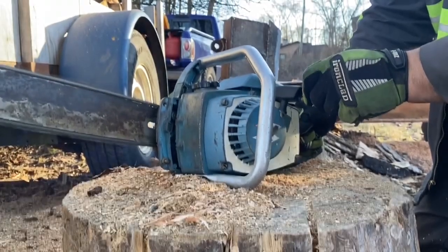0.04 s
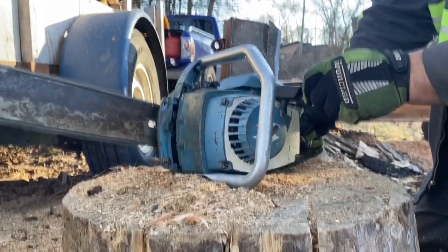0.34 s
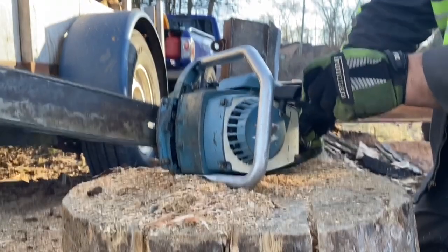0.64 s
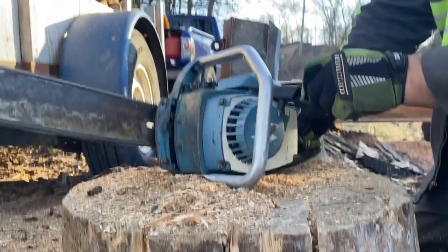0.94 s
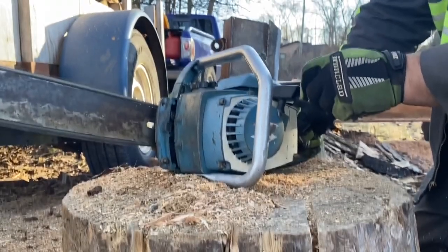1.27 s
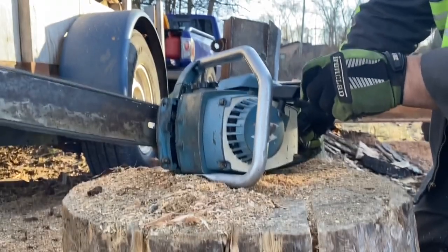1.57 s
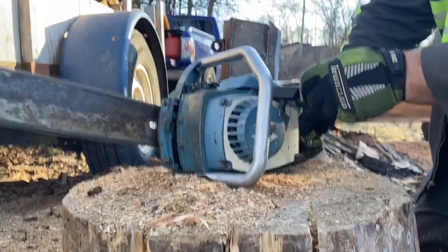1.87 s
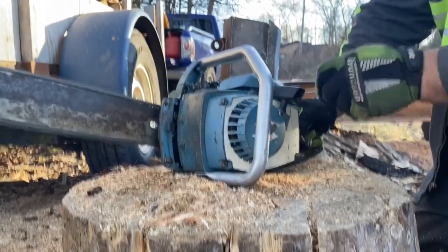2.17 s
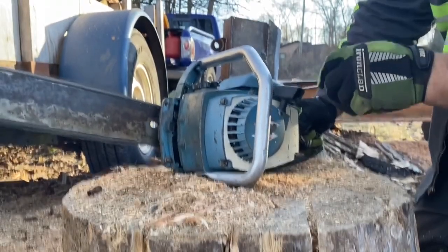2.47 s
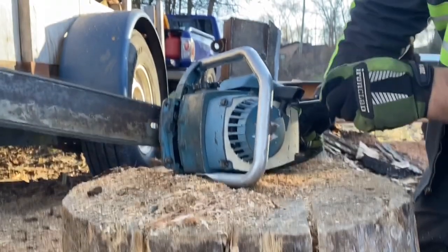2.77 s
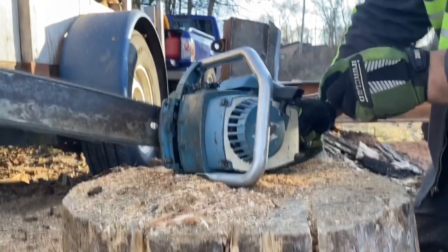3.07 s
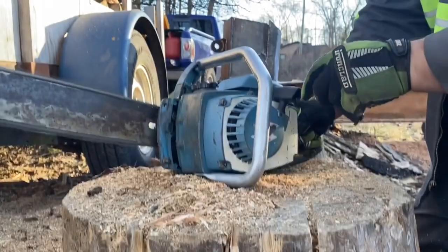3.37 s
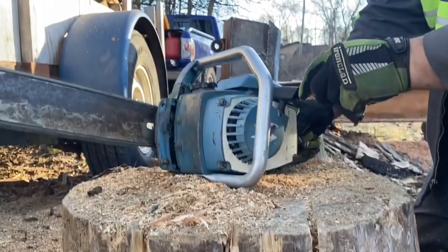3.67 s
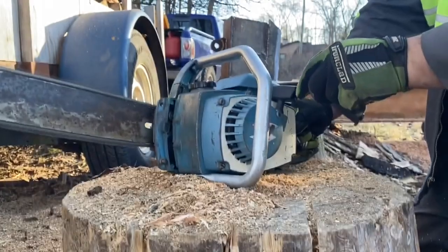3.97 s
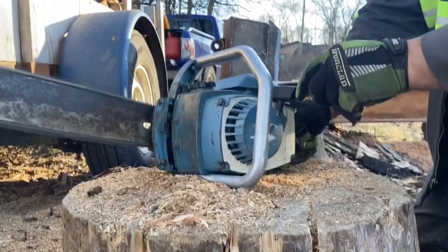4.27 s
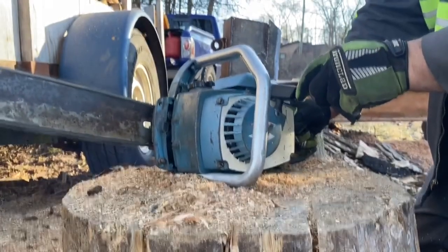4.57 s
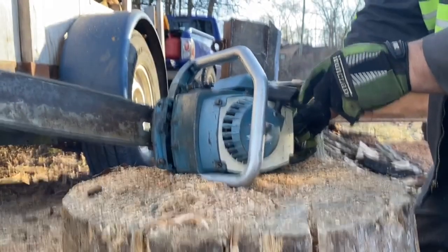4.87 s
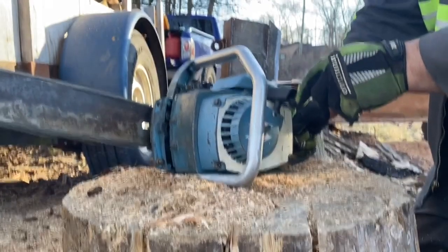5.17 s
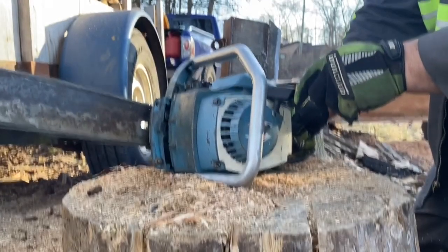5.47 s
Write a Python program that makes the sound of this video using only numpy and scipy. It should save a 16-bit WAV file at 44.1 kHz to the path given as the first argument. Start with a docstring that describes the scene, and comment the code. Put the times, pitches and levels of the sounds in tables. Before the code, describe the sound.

Close up in an open yard, a small petrol chainsaw sputters with irregular, raspy exhaust pops. The throttle is briefly squeezed twice, making it a little higher and louder as the chain chatters. It coasts down with a faint falling whine, idles for a while, gets another short blip and settles again. It is just picking up once more as the sound ends.

```python
"""Two-stroke chainsaw at idle

A small saw stands on a stump outdoors while its throttle is blipped four times. Each turn of the crank
sends a pressure pulse through the muffler, but at idle mostly every second to fourth turn fires, which
makes the popping. The intake throbs, the flywheel fan hisses in the cooling fins, the chain rattles as
the speed rises, and engine harmonics sing out as it falls. The yard adds a short reverberation."""
import sys
import numpy as np
from scipy import signal
from scipy.fft import rfft, irfft, next_fast_len
from scipy.io import wavfile
from scipy.ndimage import uniform_filter1d

SR = 44100
rng = np.random.default_rng(int(sys.argv[2]) if len(sys.argv) > 2 else 0)


def log_audio(samples):
    """Write samples as a 16-bit WAV file to the path given in sys.argv[1]."""
    # one column per channel
    frames = np.atleast_2d(samples).T
    # limit to full scale, then quantise
    limited = np.clip(frames, -1, 1)
    pcm = np.round(limited * 32767).astype(np.int16)
    wavfile.write(sys.argv[1], SR, pcm)


N = 247401

CRUISE_HZ, IDLE_HZ = 80, 72  # crank speeds; a slope in db_per_hz is per hertz of crank speed
# rotation rate of the crank: time_s, speed_hz
CRANK_SPEED = [(0.0, 85.125), (0.294, 77.509), (0.637, 72.998), (0.82, 72.077), (0.958, 71.323),
               (1.071, 90.253), (1.38, 80.552), (1.507, 99.332), (1.709, 90.667), (2.136, 79.405),
               (2.32, 76.651), (2.56, 76.388), (2.9, 72.065), (3.183, 70.494), (3.481, 70.671),
               (3.78, 68.709), (4.077, 66.501), (4.238, 92.108), (4.574, 77.558), (4.844, 72.931),
               (5.306, 69.104), (5.47, 70.068), (5.61, 94.936)]
# squeezes of the throttle: open_s, close_s
BLIPS = [(.99, 1.09), (1.385, 1.518), (4.08, 4.275), (5.5, 10)]
# firing rhythm, about 1-2 when pulling, 3 at idle, 4 when coasting: start_s, turns_per_firing
FIRING_RHYTHM = [(0, 2), (.02, 1), (.069, 3), (.105, 4), (.584, 3), (.68, 3), (.997, 1), (1.022, 2),
                 (1.068, 4), (1.263, 4), (1.385, 2), (1.515, 4), (1.588, 4), (1.663, 3), (1.751, 4),
                 (1.899, 4), (1.994, 3), (2.105, 4), (2.205, 3), (2.282, 2), (2.348, 2), (2.373, 1),
                 (2.452, 2), (2.53, 3), (2.88, 3), (3.076, 3), (3.188, 3), (3.472, 3), (3.571, 3),
                 (3.686, 2), (3.715, 3.4), (3.817, 3), (3.949, 2), (4.024, 1), (4.039, 2), (4.069, 1),
                 (4.152, 2), (4.223, 3), (4.256, 5), (4.356, 1), (4.391, 2), (4.415, 3), (4.5, 4),
                 (4.734, 4), (4.828, 2), (4.856, 3.4), (4.952, 3), (5.078, 2), (5.12, 2), (5.292, 3),
                 (5.421, 2), (5.506, 1)]
# stumbles in which the charge only half burns: time_s
HALF_BURNS = [.4, .56, .574, .669, 1.105, 1.255, 1.55, 1.623, 1.688, 1.721, 1.833, 1.868, 1.891, 2.197,
              2.378, 2.666, 3.56, 4.491, 5.496]
# how each source follows the engine: cruise_db, slope_db_per_hz, open_throttle_db
HISS_LAW, THROB_LAW = (-40.5, 0.18, 2), (-38.5, 0.37, 8.2)
RATTLE_LAW, FIRING_LAW = (-33.5, 0.24, 1.0), (-10.5, 0.0016, 2.8)
# reverberation time of the yard: frequency_hz, t60_s
YARD_DECAY = [(150, 0.51), (700, 0.093), (3000, 0.42), (10000, 0.024)]
# spectrum of the cooling air: frequency_hz, level_db
HISS_SPECTRUM = [(3500, -62), (5800, -8), (6600, -2.5), (9000, 3.5), (11000, 1.5), (13300, 1),
                 (15800, -0.5)]
# resonances of the fins and chain: centre_hz, width_hz, above_hiss_db
STEEL_MODES = [(6310, 90, 6), (7730, 160, 3), (8480, 120, 0), (9370, 130, 6), (10250, 260, 3),
               (10680, 70, 1), (11240, 100, -1), (12780, 140, 8), (13950, 200, 2)]
# engine harmonics that sing out while coasting: crank_order, cruise_db, slope_db_per_hz
COASTING_HARMONICS = [(8, -37, 0.55), (9, -50, 0.4), (11, -44, 0.1)]
# spectrum of the chattering clutch and chain: frequency_hz, level_db
RATTLE_SPECTRUM = [(25, -45), (60, 5), (130, 7), (300, 9.5), (750, 5.5), (1250, 6), (1600, 1), (2100, -1.5),
                   (2800, -5.5), (4000, -10), (5700, -13.5), (8000, -25)]
# resonances of the muffler's sheet metal: centre_hz, width_hz, level_db
CASING_MODES = [(1480, 60, -11), (2200, 300, -14), (2700, 73, 0.5), (3070, 94, -16), (3230, 460, -11.5),
                (4040, 120, -5.5), (3880, 300, -26), (5200, 56, -9)]
# spectrum of a suction pulse: frequency_hz, level_db
GULP_SPECTRUM = [(60, -29), (170, -15), (310, -9), (480, -4), (620, -5), (800, -1), (980, -10),
                 (1150, -17.5), (1400, -37), (2000, -30), (4000, -79.5)]
# spectrum of the crack of hot gas: frequency_hz, level_db
CRACK_SPECTRUM = [(600, 1), (1300, -14), (1600, -13.5), (2100, 6), (2800, 2), (3900, -0.5), (5500, -11),
                  (9000, -13)]
# exhaust spectrum of a misfire: frequency_hz, level_db
CHUFF_SPECTRUM = [(60, -30.5), (170, -13), (300, -4.5), (420, 0), (540, 0), (650, 3), (760, -2),
                  (1000, -8.5), (1280, -22), (1500, -21.5), (2000, -41.5), (5000, -84.5)]
# exhaust spectrum of a fired turn: frequency_hz, level_db
BANG_SPECTRUM = [(40, -13), (80, -0.5), (130, -4.5), (240, -6), (310, -3), (400, 6.5), (520, 2), (660, 4),
                 (820, 0), (980, -2), (1250, -21), (1460, -14), (1740, -15.5), (1950, -37), (5000, -42)]
# all-pass sections that delay the lows of each kind of pulse: centre_hz, width_hz
BANG_TRAIL = [(10, 373), (324, 350), (129, 63)]
CHUFF_TRAIL, GULP_TRAIL = [(274, 218)], [(338, 607)]
# level difference between the channels: frequency_hz, left_minus_right_db
LEFT_LEVEL = [(60, 11), (250, -3.5), (380, 0), (540, 4.5), (700, 3), (1400, 2), (2800, 2.5), (4600, 5.5),
              (6400, 0)]
# phase difference between the channels: frequency_hz, left_lead_rad
LEFT_LEAD = [(60, 0), (300, 0), (480, .7), (620, .2), (1500, .7), (3000, 1.5), (3800, 0), (7500, 0),
             (8400, -3), (9300, -3.2), (10800, -6.28), (11700, -6.28), (13200, -9.4), (13800, -9.5),
             (15000, -12.57)]


def amp(db):
    """Amplitude ratio of a level in decibels."""
    return 10 ** (np.asarray(db) / 20)


def unit(x):
    """Normalisation to an rms of 1."""
    return x / np.sqrt(np.mean(x ** 2) + 1e-20)


def along(points, hz):
    """Interpolation on a logarithmic frequency axis."""
    frequencies, values = np.transpose(points)
    return np.interp(np.log(hz + 1), np.log(frequencies + 1), values)


def filtered(x, response):
    """Linear filtering: the spectrum is multiplied by a frequency response."""
    size = 2 * next_fast_len(N // 2 + SR // 4)
    return irfft(rfft(x, size) * response(np.fft.rfftfreq(size, 1 / SR)), size)[..., :N]


def minimum_phase(gain):
    """Folding the cepstrum gives the causal response of least delay for this gain."""
    cepstrum = irfft(np.log(gain + 1e-6))
    half = len(cepstrum) // 2
    return np.exp(rfft(np.r_[cepstrum[0], 2 * cepstrum[1:half], np.zeros(half)]))


def bass_shelf(x, below_hz, gain_db):
    """A shelving filter changes the level of the lows alone."""
    bass = filtered(x, lambda hz: 1 / (1 + (hz / below_hz) ** 4))
    return x + bass * (amp(gain_db) - 1)


def noise(spectrum, channels):
    """Spectral shaping turns white noise into coloured noise of rms 1."""
    return unit(filtered(rng.standard_normal((channels, N)), lambda hz: amp(along(spectrum, hz))))


def wide_noise(spectrum, coherence=0.44):
    """Partial coherence: both channels share a fraction of the noise power."""
    left, right, common = noise(spectrum, channels=3)
    return np.sqrt(coherence) * common + np.sqrt(1 - coherence) * np.array([left, right])


def pulses(times, sizes):
    """An impulse train; linear interpolation places each impulse between samples."""
    at = np.clip(times * SR, 0, N)
    i = at.astype(int)
    return (np.bincount(i, sizes * (1 - at + i), N + 2) + np.bincount(i + 1, sizes * (at - i), N + 2))[:N]


def fading(x, life_s):
    """Each impulse starts an exponential decay."""
    return signal.lfilter([1], [1, -np.exp(-1 / (life_s * SR))], x)


def speed(times=np.arange(N) / SR):
    """Rotation rate of the crank in hertz, by default at every sample."""
    return np.interp(times, *np.transpose(CRANK_SPEED))


def throttle(travel_s=0.083):
    """Opening of the throttle, in linear ramps between 0 and 1."""
    clock = np.arange(N) / SR
    ramp = lambda s: np.clip((clock - s) / travel_s + .5, 0, 1)
    return sum(ramp(opens) - ramp(closes) for opens, closes in BLIPS)


def running_db(cruise_db, slope_db_per_hz, open_throttle_db=0):
    """A source's level in decibels varies linearly with crank speed and throttle."""
    return cruise_db + slope_db_per_hz * (speed() - CRUISE_HZ) + open_throttle_db * throttle()


def yard(x):
    """Scattering from the stump, ground and nearby surfaces leaves a short diffuse tail."""
    hz, t, spectra = signal.stft(rng.standard_normal((2, SR // 4)), SR, nperseg=256)
    decay = amp(-60 * t / along(YARD_DECAY, hz)[:, None])
    tail = signal.istft(spectra * decay, SR, nperseg=256)[1]
    tail = tail / np.linalg.norm(tail, axis=1, keepdims=True)
    left, right = signal.fftconvolve(x, tail, axes=1)[:, :N]
    side = filtered(left - right, lambda hz: hz / (hz + 700))  # long waves reach both sides alike
    return np.array([left + right + side, left + right - side]) / 2


def fan(angle, grain_db=1.5):
    """Flow noise: cooling air hisses past the fins and excites resonances of the thin steel."""
    def resonances(hz):
        peaks = sum(amp(db) ** 2 / (1 + (2 * (hz - centre) / width) ** 2)
                    for centre, width, db in STEEL_MODES)
        return np.sqrt(1 + peaks)
    grain = unit(uniform_filter1d(rng.standard_normal(N), size=50))
    shake = 1 + 0.061 * np.cos(2 * np.pi * (angle + 0.39))
    hiss = unit(filtered(noise(HISS_SPECTRUM, channels=1), resonances))
    return amp(running_db(*HISS_LAW) + grain_db * grain) * shake * hiss


def coasting_whine(angle, lead_turns=0.059):
    """Harmonics of the engine sing out and fall in pitch with the crank rate as the saw coasts."""
    phase = 2 * np.pi * (angle + lead_turns)
    return sum(amp(running_db(db, slope, open_throttle_db=-9)) * np.cos(order * phase)
               for order, db, slope in COASTING_HARMONICS)


def clutch(angle, lowest_order=20, count=26):
    """Friction: the slipping clutch drags the chain, which buzzes on high harmonics of the crank."""
    slip = np.cumsum(rng.standard_normal(N)) / SR
    phases = rng.random((count, 2))
    buzz = sum(np.cos(2 * np.pi * (order * (angle + slip) + phase[:, None])) / order
               for order, phase in enumerate(phases, lowest_order))
    return amp(running_db(cruise_db=-48, slope_db_per_hz=0.58)) * unit(buzz)


def casing(x):
    """Modal superposition: the sheet metal rings as a sum of damped resonators."""
    def response(hz):
        return sum((-1) ** k * amp(db) * 1j * hz * width / (centre ** 2 - hz ** 2 + 1j * hz * width)
                   for k, (centre, width, db) in enumerate(CASING_MODES))
    return filtered(x, response)


def chain(angle, clatter_db=2, thinning_db_per_hz=0.76, taps_per_s=300):
    """Impact noise: clutch and chain chatter, shaken by the piston, and links tap the housing."""
    knocks = unit(uniform_filter1d(rng.standard_normal(N), size=90))
    shake = 1 + 0.011 * np.cos(2 * np.pi * (angle - .1))
    chatter = amp(clatter_db * knocks) * wide_noise(RATTLE_SPECTRUM)
    bass_db = -12.5 - thinning_db_per_hz * (speed() - CRUISE_HZ)  # faster knocks are lighter
    chatter = bass_shelf(chatter, below_hz=395, gain_db=bass_db)
    taps = (rng.random((2, N)) < taps_per_s / SR) * rng.standard_normal((2, N))
    return amp(running_db(*RATTLE_LAW)) * shake * (chatter + amp(-13) * unit(casing(taps)))


def falling_pulse(x, spectrum, trail):
    """Group delay: each pulse is coloured and its lows trail behind, so the pop falls in pitch."""
    def response(hz):
        poles = np.prod([centre ** 2 - hz ** 2 + 1j * hz * width for centre, width in trail], axis=0)
        return minimum_phase(amp(along(spectrum, hz))) * np.conj(poles) / poles
    return filtered(x, response)


def thinned(x, below_hz, loss_db_per_hz):
    """Shorter pulses carry less bass: the lows fall above idle speed, unless the throttle is open."""
    above_idle_hz = np.maximum(speed() - IDLE_HZ, 0)
    return bass_shelf(x, below_hz, -loss_db_per_hz * above_idle_hz * (1 - throttle()))


def intake_throb(angle):
    """Periodic flow: the crankcase draws air once a turn and radiates a tone at the crank rate."""
    return amp(running_db(*THROB_LAW)) * np.cos(2 * np.pi * (angle - .33))


def intake_gulps(times, fires, fired_db=5, slope_db_per_hz=0.03):
    """Rarefaction: later in each turn the intake port shuts and makes a suction pulse."""
    speed_hz = speed(times)
    shuts = times + .345 / speed_hz - .00128
    scatter_db = .5 * rng.standard_normal(len(times))
    level_db = 14.5 + fired_db * fires + slope_db_per_hz * (speed_hz - CRUISE_HZ) + scatter_db
    suction = -falling_pulse(pulses(shuts, amp(level_db)), GULP_SPECTRUM, GULP_TRAIL)
    return thinned(suction, below_hz=280, loss_db_per_hz=2)


def combustion(angle, purge_db=1.71, scatter_db=1):
    """Scavenging: misfires flush burnt gas out, so the next full firing is stronger. One value a turn."""
    clock = np.arange(N) / SR
    turn = np.arange(np.ceil(angle[-1]))
    times = np.interp(turn, angle, clock)
    starts, steps = np.transpose(FIRING_RHYTHM)
    edges = np.r_[np.searchsorted(times, starts), len(turn)]
    due = np.concatenate([np.arange(a, b, step) for a, b, step in zip(edges, edges[1:], steps)])
    half = np.isin(turn, np.round(np.interp(HALF_BURNS, times, turn)))
    full = ~half & np.isin(turn, np.round(due))
    fires = full | half
    turns_since = lambda event: turn - np.maximum.accumulate(np.where(event, turn, 0))
    misfires_before = np.roll(turns_since(fires), 1)
    purged = np.log2(1 + np.minimum(misfires_before, 3))
    burn_db = np.where(half, 0, purge_db * purged) + scatter_db * rng.standard_normal(len(turn))
    fire_db = np.interp(times, clock, running_db(*FIRING_LAW)) + burn_db
    return times, fires, fire_db, turns_since(full)


def rasp(blasts, open_throttle_db=1):
    """Impulsive excitation: each blast of hot gas cracks and rings the muffler's sheet metal."""
    blasts = blasts * amp(open_throttle_db * throttle())
    envelope = amp(-25) * fading(blasts, life_s=0.0011) + amp(-31) * fading(blasts, life_s=0.011)
    return envelope * wide_noise(CRACK_SPECTRUM) + amp(5) * casing(blasts)


def exhaust(times, fires, fire_db, since_full, ragged_s=.00004, smoulder_db=2):
    """Pulsed flow: one puff a turn leaves the muffler, a bang if it fires and a chuff if not."""
    level_scatter, time_scatter = rng.standard_normal((len(times), 2)).T
    miss_db = -13 + 0.0752 * (speed(times) - CRUISE_HZ) + 0.5 * level_scatter
    miss_db += smoulder_db * (since_full > 2)  # by the third misfire enough mixture has built up
    strong, weak = fires * amp(fire_db), ~fires * amp(miss_db)
    late_s = ~fires * .00034  # unburnt gas leaves late
    misfiring = since_full + np.roll(since_full, 1) > 0
    opens = times - .00183 + late_s + ragged_s * misfiring * time_scatter
    bangs = falling_pulse(pulses(opens, strong), BANG_SPECTRUM, BANG_TRAIL)
    chuffs = falling_pulse(pulses(opens, weak), CHUFF_SPECTRUM, CHUFF_TRAIL)
    chuffs = thinned(chuffs, below_hz=330, loss_db_per_hz=.5)
    return amp(28.5) * bangs + amp(30.5) * chuffs + rasp(pulses(opens, strong + amp(-30) * weak))


def scene():
    """Superposition: sources driven by one crank add to the yard's reverberation."""
    angle = -.128 + np.cumsum(speed()) / SR  # in turns
    times, fires, fire_db, since_full = combustion(angle)
    engine = intake_gulps(times, fires) + exhaust(times, fires, fire_db, since_full)
    saw = engine + coasting_whine(angle) + chain(angle) + clutch(angle)
    return saw + amp(-22) * yard(saw) + intake_throb(angle) + fan(angle)


def record(dry, low_cut_hz=44, top_hz=15850):
    """Level and phase differences spread the band-limited stereo image; the deep bass stays central."""
    sides = np.array([[.5], [-.5]])
    difference = filtered(dry[0] - dry[1], lambda hz: hz ** 2 / (hz ** 2 + 200 ** 2))

    def microphones(hz):
        level = amp(sides * along(LEFT_LEVEL, hz) * (hz > 120))
        phase = np.exp(1j * sides * along(LEFT_LEAD, hz))
        low_cut = hz ** 4 / (hz ** 4 + low_cut_hz ** 4)
        return level * phase * low_cut * (hz < top_hz)
    return filtered(dry.mean(axis=0) + sides * difference, microphones)


dry = scene()
out = record(dry)
log_audio(out)
```